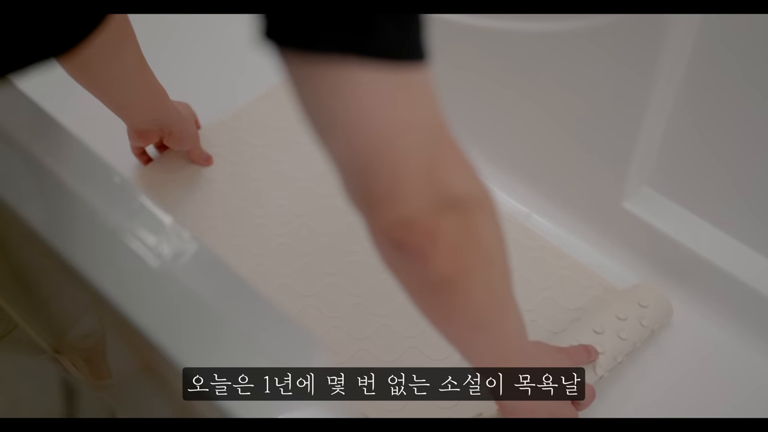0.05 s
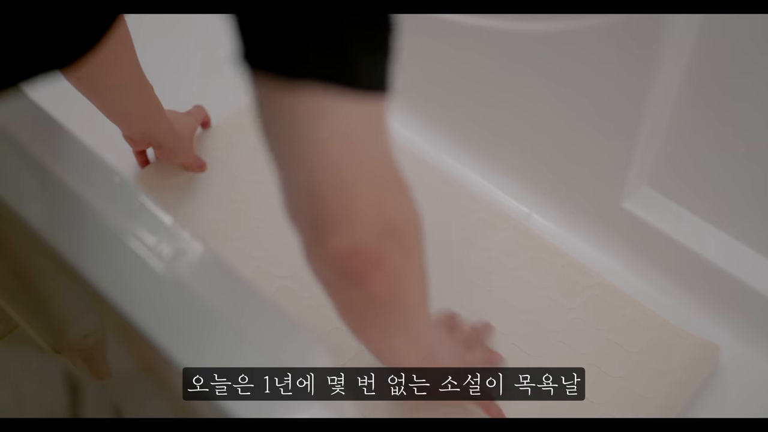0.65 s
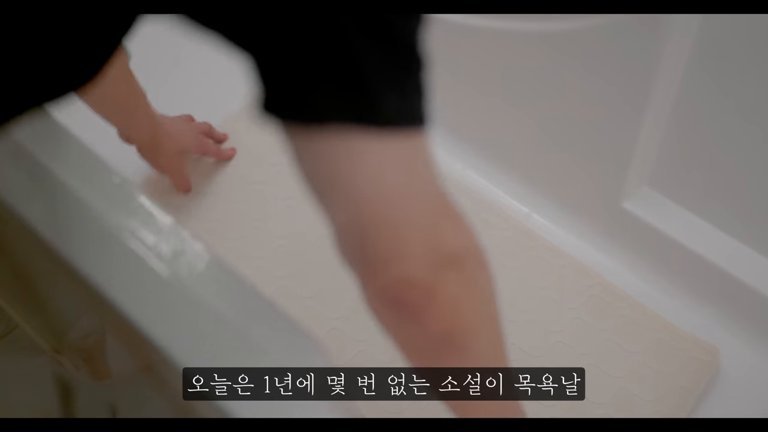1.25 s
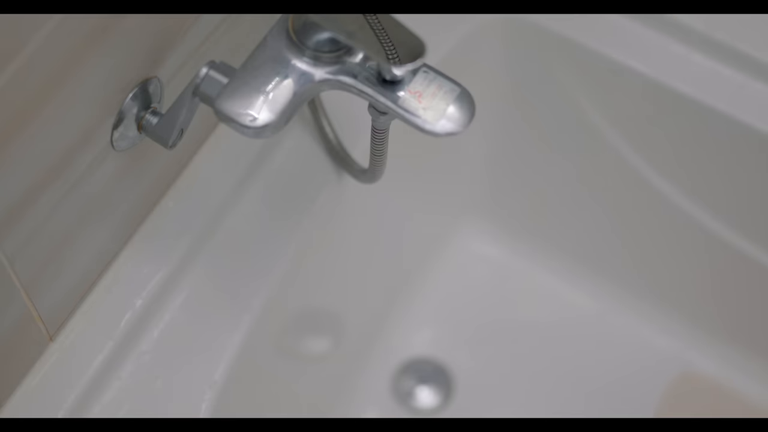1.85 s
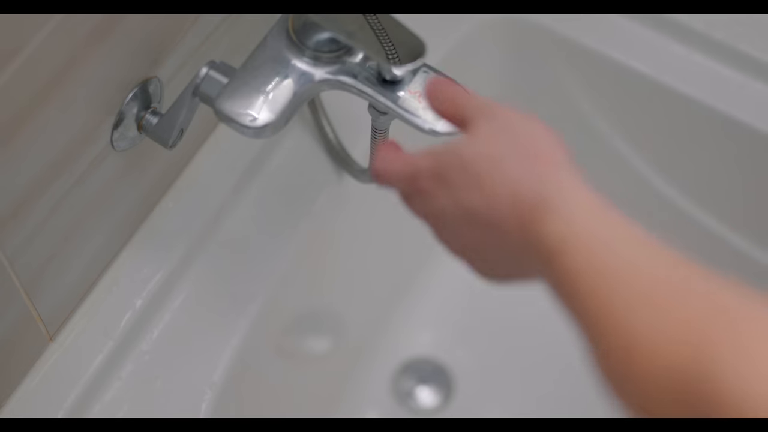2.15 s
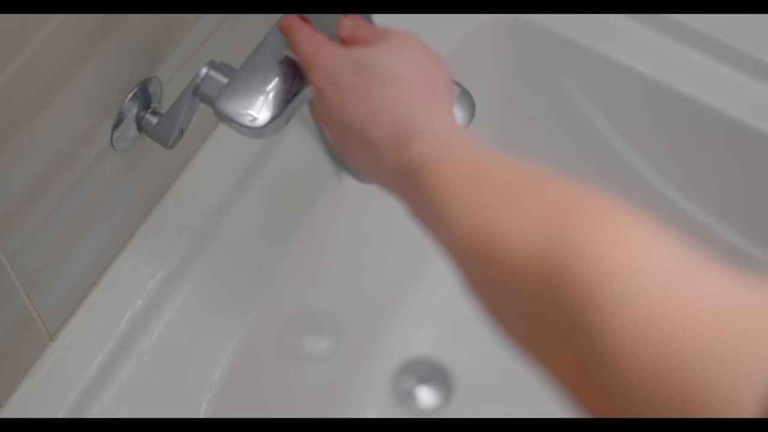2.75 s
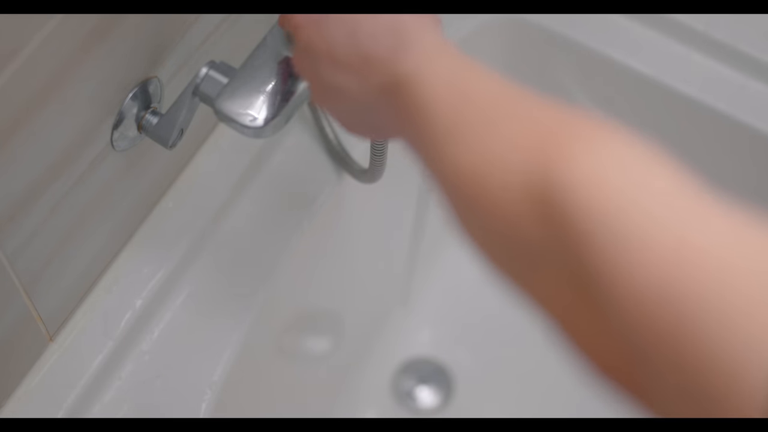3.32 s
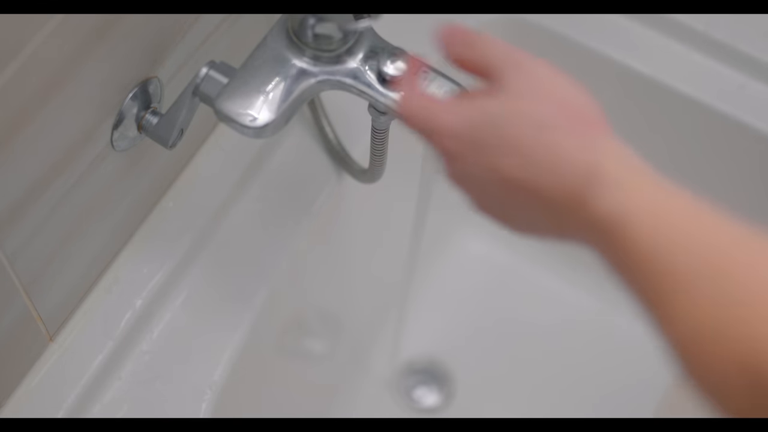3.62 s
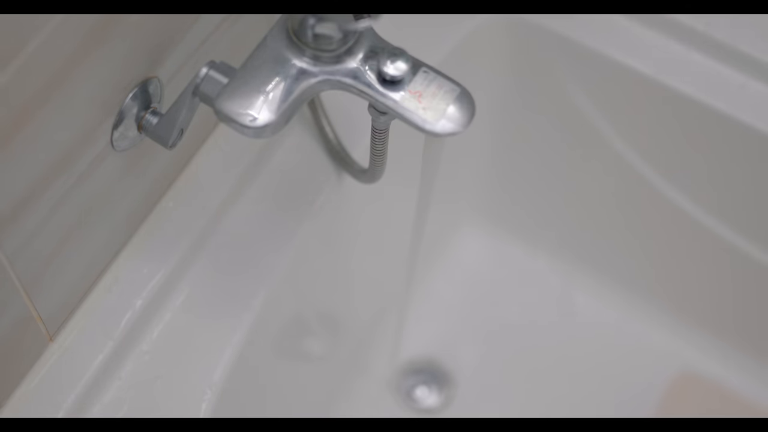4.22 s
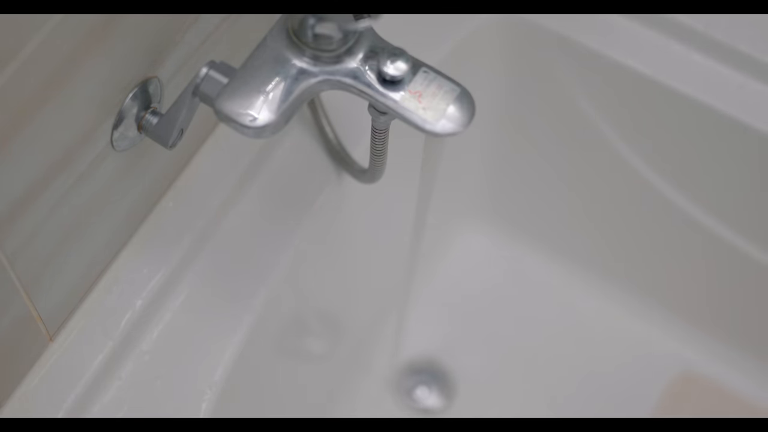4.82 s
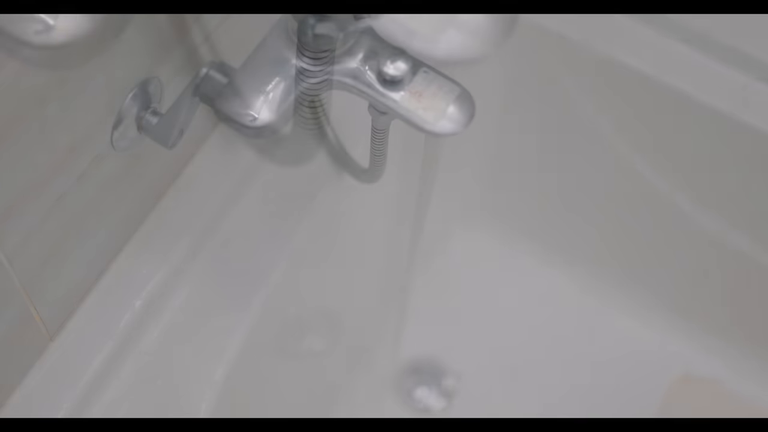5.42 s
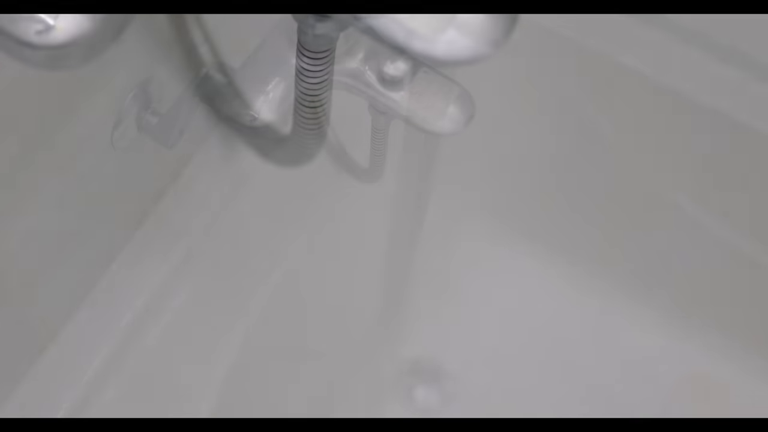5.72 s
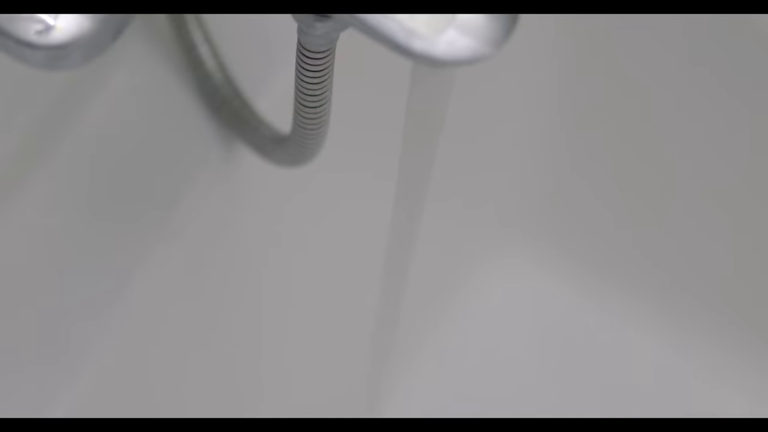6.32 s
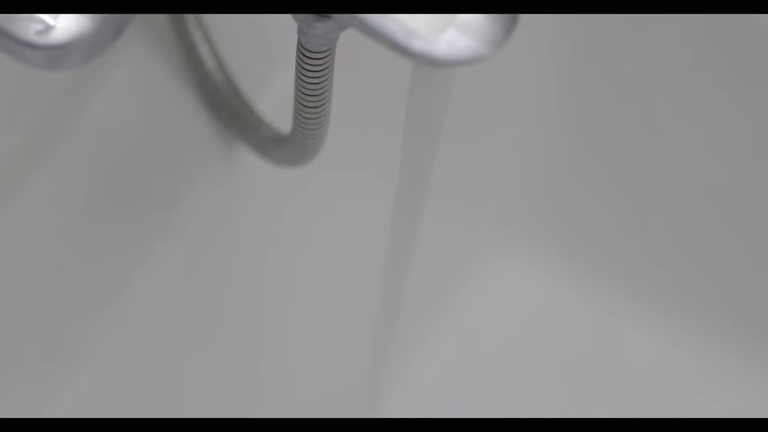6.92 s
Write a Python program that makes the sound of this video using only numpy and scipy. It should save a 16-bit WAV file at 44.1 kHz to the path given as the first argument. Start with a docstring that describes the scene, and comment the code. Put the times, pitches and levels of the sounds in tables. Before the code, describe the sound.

Wet slaps of a rubber mat, a few soft bumps, then a tap opens and water pours onto the bathtub floor.

```python
"""First a wet rubber mat slides and slaps flat in an empty bathtub, popping the air trapped under it.
Then a hand rustles toward the tap, the tub takes a few dull bumps, and the lever rattles.
At about 3 s the valve knocks, air hisses from the spout and the first water dribbles down.
At 3.5 s the valve bangs fully open, and to the end a jet spatters on the tub floor and traps ringing
bubbles. It all echoes in a small tiled bathroom, over a low hush, a thin whine and a faint high hiss."""
import sys
import numpy as np
from scipy import signal
from scipy.fft import rfft, irfft, next_fast_len
from scipy.io import wavfile
from scipy.ndimage import uniform_filter1d

SR = 44100
rng = np.random.default_rng(int(sys.argv[2]) if len(sys.argv) > 2 else 0)


def master(y):
    """Save y as 16-bit WAV."""
    cut = np.clip(np.atleast_2d(y).T, -1, 1)
    pcm = np.round(cut * 32767)  # scale
    wavfile.write(sys.argv[1], SR, pcm.astype(np.int16))


N = 307377
TIME = np.arange(N) / SR
SIZE = 2 ** 15  # samples in one short sound or filter
FREQ = np.maximum(np.fft.rfftfreq(SIZE, 1 / SR), 1)
JET_START_S = 3.467  # the valve is thrown open


def jet():
    """The jet breaks into drops that crack on the tub and trap bubbles; one sound per landing spot."""
    # tone of the spray: pitch_hz, level_db
    spray_tone = [(50, -29), (85, -42), (130, -23.5), (270, -15.5), (420, -16), (800, -13.5), (1450, -12.5),
                  (2200, -7.5), (4800, -3.5), (6600, 0.5), (8300, 4), (10000, 3), (12000, -2.5),
                  (15000, -13.5)]
    # notes of the tub and the thin film of water on it: pitch_hz, width_hz, above_spray_db
    film_notes = [(264, 59, 4.5), (3120, 70, 2.5), (4050, 330, 3.5), (4830, 240, 2), (5044, 230, 4.5),
                  (5820, 110, 1), (6060, 91, 0.5), (8130, 250, -2)]
    film = np.sqrt(1 + modes(film_notes) ** 2)
    spray = undb(along(spray_tone)) * film
    bubble_tone = film / (1 + (1200 / FREQ) ** 3)  # small bubbles give off no bass
    flow = envelope(JET_START_S, rise_s=0.014)
    spatter_db = -19.51 - 0.21 * (TIME - JET_START_S)  # softer as the tub floor gets wet
    gurgle_gain = undb(-35 + 2.6 * wander(rate=22))
    # the wavering jet shares its flow among three spots, now more here, now more there
    shares = np.array([undb(4.0 * wander(rate=14)) for _ in range(3)])
    shares /= np.linalg.norm(shares, axis=0)
    surge, out = undb(0.8 * wander(rate=50)), []
    for share in shares:
        small_drops = clicks(rate=4000, spread_db=2.0)
        big_drops = undb(-2.5) * cracks(rate=100, spread_db=4.2, decay_s=.0012)
        spatter = unit(colour((small_drops + big_drops) * surge, spray))
        fizz = bubbles(rate=220, low_hz=4553, high_hz=10180, cycles=115, glide=0.106, spread_db=3.0)
        gurgle = bubbles(rate=200, low_hz=2120, high_hz=5530, cycles=13.6, glide=0.094, spread_db=2.5)
        bubbling = colour(undb(spatter_db - 13.49) * fizz + gurgle_gain * gurgle, bubble_tone)
        out.append(flow * share * (undb(spatter_db) * spatter + bubbling))
    return out


def cracks(rate, spread_db, decay_s):
    """Big drops land, each bursting into a very short puff of noise."""
    impacts = clicks(rate, spread_db) ** 2 + 1e-18
    energy = signal.lfilter([1], [1, -np.exp(-2 / (decay_s * SR))], impacts)
    return unit(np.sqrt(energy) * rng.choice([-1, 1], N))


def bubbles(rate, low_hz, high_hz, cycles, glide, spread_db, size=N):
    """Small air pockets ring briefly, rising in pitch as they fade."""
    out = np.zeros(size + SR)
    for when, pitch, strength, life in rng.random((int(rate * size / SR), 4)):
        hz = low_hz * (high_hz / low_hz) ** pitch
        length = int(np.clip(cycles * (.5 + life) / hz, 0, .5) * SR) + 2
        age = np.arange(length) / length
        phase = 2 * np.pi * hz * length / SR * age * (1 + glide * age / 2)
        ring = np.sin(phase) * np.exp(-np.log(100) * age)
        start = int(when * size)
        out[start:start + length] += ring * undb(-spread_db * np.log(max(strength, .01)))
    return unit(out[:size])


def spurts():
    """The film of water folds over and traps a cloud of bubbles of similar size."""
    # bubble clouds: middle_s, level_db, pitch_hz
    clouds = [(3.669, -25.5, 3900), (3.80, -28, 3900), (3.835, -32, 2590), (4.33, -31.5, 2300),
              (4.36, -25, 4220), (4.79, -29.5, 2990), (5.068, -33, 2380), (5.37, -31, 3580),
              (5.842, -28.5, 3680), (6.16, -35, 3280), (6.365, -27, 3980), (6.39, -29.5, 2395),
              (6.61, -31, 3630)]
    rise_s, pitch_ratio = 0.032, 1.3
    size, out = int(2 * rise_s * SR), 0
    for middle_s, db, hz in clouds:
        cloud = bubbles(rate=640, low_hz=hz / pitch_ratio, high_hz=hz * pitch_ratio,
                        cycles=40, glide=0.12, spread_db=-1, size=size)
        spurt = colour(cloud * np.hanning(size), resonance(hz, hz) ** 2)
        out += place(spurt, middle_s - rise_s, db)
    return out


def trickle():
    """Air hisses out of the spout just before the first water dribbles down; both give way to the jet."""
    # tone of the escaping air: pitch_hz, level_db
    hiss_tone = [(1000, -44), (4000, -15), (7000, -6), (9800, 3), (12000, -2.5), (15500, -10)]
    # tone of the first drops landing: pitch_hz, level_db
    dribble_tone = [(60, -41), (140, -4.5), (300, -2), (450, -5.5), (900, -4.5), (1500, 0), (2300, -1),
                    (4000, -8.5), (8000, -11), (15000, -17)]
    water_start_s, water_rise_s, easing_db_per_s = 3.17, 0.035, 13
    air = envelope(start_s=3.122, rise_s=0.021, stop_s=JET_START_S, fall_s=0.14)
    water = envelope(water_start_s, water_rise_s, stop_s=JET_START_S, fall_s=0.14)
    easing = undb(-easing_db_per_s * np.maximum(TIME - water_start_s - water_rise_s, 0))
    tap_ring = undb(-7) * resonance(hz=5330, width_hz=90)
    hiss = unit(colour(rng.standard_normal(N), undb(along(hiss_tone)) + tap_ring))
    hiss_db = -39.5 + 5 * water  # louder once water reaches the mesh in the spout
    dribble = unit(colour(clicks(rate=4500, spread_db=2.0), undb(along(dribble_tone))))
    return easing * (air * undb(hiss_db) * hiss + water * undb(-34.5) * dribble)


def tap():
    """The lever rattles when gripped; the valve knocks at its stops and spits a burst of water."""
    # the lever rattling under the fingers: start_s, level_db
    rattles = [(2.388, -44.5), (2.407, -52), (2.433, -55)]
    # notes the lever rings at: pitch_hz, width_hz, level_db
    lever_notes = [(298, 99, -3), (767, 130, 2.5), (948, 48, 3.5), (3000, 560, -14), (3680, 220, -6),
                   (4000, 330, -13), (6770, 370, -6.5), (7600, 200, -12), (9750, 600, -22)]
    # valve knocks: start_s, level_db, burst_above_knock_db
    knocks = [(3.0317, -43, -32), (3.4663, -21.5, 6)]
    # notes the body of the tap rings at: pitch_hz, width_hz, level_db
    body_notes = [(267, 200, -7.5), (620, 160, -6.5), (1460, 240, -1), (1690, 150, 5.5), (1790, 240, -1.5),
                  (3000, 6000, -24), (5330, 60, -9), (7140, 150, -25)]
    # tone of the burst of water: pitch_hz, level_db
    burst_tone = [(100, -20), (500, -7), (1400, 6.5), (2500, 4.5), (4500, 11), (6200, -1), (8200, 12.5),
                  (11000, 3), (15000, -5)]
    lever, body = modes(lever_notes, order=2), modes(body_notes, order=2)
    water_delay_s, out = 0.00082, 0
    for start_s, db in rattles:
        out += place(colour(blow(decay_s=.002, snap=0.67), lever), start_s, db)
    for start_s, db, burst_db in knocks:
        knock = colour(blow(decay_s=0.0039, snap=1.6), body)
        burst = colour(blow(decay_s=.001), undb(along(burst_tone)))
        out += place(knock, start_s, db) + place(burst, start_s + water_delay_s, db + burst_db)
    return out


def mat():
    """The mat slides and flops down with wet smacks, popping the air under it and thumping the tub."""
    # slaps: start_s, level_db, treble_limit_hz, pop_hz, pop_db, thump_above_slap_db, decay_s,
    # smack_above_slap_db
    slaps = [(0.298, -45, 2200, 870, 14, -8, 0.035, -15), (0.338, -35, 1800, 490, 7, -9.5, 0.033, -18.5),
             (0.437, -36, 1850, 557, 10, -7.5, 0.018, -18),
             (0.563, -25, 5200, 4500, 12.5, -21.5, 0.0053, -21),
             (0.642, -22.5, 5000, 1400, -3, -32, 0.013, -12.5),
             (1.034, -38, 3200, 1000, -3, -15, 0.0041, -12), (1.065, -22.5, 3950, 860, 7, -20, 0.0024, -30),
             (1.1359, -29, 2100, 1110, 5, -23, 0.0025, -16),
             (1.142, -29.5, 5000, 620, 16, -4.5, 0.0036, -11)]
    # tone of the tub under the mat: pitch_hz, level_db
    tub_tone = [(60, -45), (120, -14), (330, -15.5), (520, -6.5), (780, -3), (1250, -2.5), (2000, -5.5),
                (3300, -7.5), (5000, -13.5), (9000, -15.5), (15000, -27.5)]
    # tone of wet rubber meeting enamel: pitch_hz, level_db
    smack_tone = [(1500, -27), (3500, 6), (5000, 2), (9000, 0), (12000, -8), (15000, -19)]
    # the mat dragged over the tub: start_s, length_s, level_db, scuff_above_rub_db
    drags = [(-0.02, 0.044, -57, -5), (0.275, 0.27, -58.5, -3), (0.662, 0.25, -36, -6),
             (1.2, 0.13, -53.5, -4.5), (1.34, 0.06, -44.5, -9.5), (1.534, 0.053, -53.5, -15),
             (1.602, 0.02, -69.5, 12)]
    tub, out = undb(along(tub_tone)), 0
    for start_s, db, limit_hz, pop_hz, pop_db, thump_db, decay_s, smack_db in slaps:
        softness = 1 / np.sqrt(1 + (FREQ / limit_hz) ** 8) + undb(-12)
        pop = 1 + undb(pop_db) * resonance(pop_hz, 450 + 0.31 * pop_hz) ** 2
        # a brief slap is mostly snap, a long one mostly flutter
        slap = colour(blow(decay_s, snap=0.0024 / decay_s), tub * softness * pop)
        smack = colour(blow(decay_s=.004), undb(along(smack_tone)))
        thump = colour(blow(decay_s=0.034), resonance(hz=247, width_hz=520) ** 4)
        out += place(slap, start_s, db)
        out += place(smack, start_s, db + smack_db)
        out += place(thump, start_s, db + thump_db)
    dull, bright = 1 / (1 + (FREQ / 3000) ** 2), FREQ ** 2 / (FREQ ** 2 + 4000 ** 2)
    rub = unit(colour(clicks(rate=4300, spread_db=4), tub * dull))
    scuff = unit(colour(clicks(rate=2500, spread_db=3.5), tub * bright))
    for start_s, length_s, db, scuff_db in drags:
        stroke = envelope(start_s, rise_s=0.024, stop_s=start_s + length_s, fall_s=0.032)
        out += undb(db) * stroke * (rub + undb(scuff_db) * scuff)
    return out


def bumps():
    """Soft bumps wake only the low ring of the tub."""
    # dull thuds around the tub: start_s, level_db, pitch_hz, decay_s
    thuds = [(0.0, -47.5, 116, 0.021), (0.355, -49, 160, .008), (2.04, -48.5, 315, 0.081),
             (2.11, -63, 160, 0.017), (2.394, -54, 121, 0.04), (2.55, -47, 197, 0.016),
             (2.767, -59, 830, 0.018), (3.043, -48.5, 280, 0.082), (3.467, -34, 202, 0.0051)]
    return sum(place(colour(blow(decay_s), resonance(hz, hz) ** 4), start_s, db)
               for start_s, db, hz, decay_s in thuds)


def bathroom(x, direct_db):
    """Sound arrives directly, then as quick echoes off the tub walls, then as a ring off the tiles."""
    # time the echoes take to fade by 60 dB: pitch_hz, fade_s
    fade_times = [(100, 0.43), (300, 0.42), (800, 0.66), (1600, 0.62), (2400, 0.45), (5000, 0.49),
                  (14000, 0.44)]
    t = TIME[:SIZE]
    noise, echoes = rfft(rng.standard_normal(SIZE)), 0
    octaves = np.clip(np.log2(FREQ / 32), 0, 9)
    for octave in range(10):
        band = np.maximum(1 - np.abs(octaves - octave), 0)
        fade_s = along(fade_times, 32 * 2 ** octave)
        echoes += irfft(noise * band) * np.exp(-np.log(1000) * t / fade_s)
    echoes *= (1 + 0.61 * np.exp(-t / 0.005)) * (t > .001)  # strong first echoes, after a tiny gap
    echoes /= np.linalg.norm(echoes)
    echoes[0] += undb(direct_db)
    return signal.oaconvolve(x, even(echoes))[:N]


def background():
    """A low hush, a thin whine and a faint high hiss; a rustle swells as the hand reaches for the tap."""
    # tone of the quiet room: pitch_hz, level_db
    hush_tone = [(30, -61), (70, -37), (120, -1), (200, -7), (290, 2), (420, -9), (850, -8.5), (1400, -15),
                 (3000, -21), (8000, -22.5), (12000, -21.5), (15000, -37)]
    # a thin whine near 10 kHz and a faint, narrow band of very high hiss near 13.4 kHz: pitch_hz,
    # half_width_hz, level_before_change_db, level_after_change_db
    high_bands = [(10020, 25, -80, -81), (13400, 350, -73.5, -82)]
    change_s = 1.66  # the thin high bands change level here
    hush = undb(along(hush_tone))
    brighter = 1 + undb(-1) * resonance(hz=2300, width_hz=3200)
    rustle = unit(colour(rng.standard_normal(N), hush * brighter))
    reach = envelope(start_s=1.27, rise_s=1.0, stop_s=2.335, fall_s=0.14)
    out = undb(-61.5) * unit(colour(rng.standard_normal(N), hush))
    out += undb(-54) * reach * rustle
    for hz, half_width_hz, early_db, late_db in high_bands:
        band = unit(colour(rng.standard_normal(N), resonance(hz, 2 * half_width_hz) ** 2))
        out += undb(np.where(TIME < change_s, early_db, late_db)) * band
    return out


def blow(decay_s, snap=0):
    """One thing strikes another: an optional sharp snap, then a noisy force that dies away."""
    force = rng.choice([-1, 1], SIZE) * np.exp(-np.minimum(TIME[:SIZE] / decay_s, 20))
    force[0] += snap * np.linalg.norm(force)
    return even(force)


def clicks(rate, spread_db):
    """Tiny random impacts, about `rate` a second, most weak and a few strong."""
    strength = undb(spread_db * np.minimum(rng.exponential(size=N), 3.5))
    return unit((rng.random(N) < rate / SR) * strength * rng.choice([-1, 1], N))


def wander(rate):
    """A smooth random drift that takes a new direction `rate` times a second."""
    step = int(SR / rate)
    stairs = np.repeat(rng.standard_normal(N // step + 1), step)
    return unit(uniform_filter1d(stairs, step)[:N])


def envelope(start_s, rise_s, stop_s=np.inf, fall_s=1):
    """Rise smoothly, hold until the stop, then die away."""
    rise = np.sin(np.pi / 2 * np.clip((TIME - start_s) / rise_s, 0, 1)) ** 2
    return rise * np.exp(-np.clip((TIME - stop_s) / fall_s, 0, 20))


def place(x, start_s, db):
    """Put a short sound at its time, with the energy of 30 ms at this level."""
    placed = np.concatenate([np.zeros(max(int(start_s * SR), 0)), x, np.zeros(N)])[:N]
    return placed * undb(db) * np.sqrt(.03 * SR / np.sum(x ** 2))


def resonance(hz, width_hz):
    """Gain of one ringing note: 1 at its pitch, less on either side."""
    return 1 / np.sqrt(1 + ((FREQ ** 2 - hz ** 2) / (FREQ * width_hz)) ** 2)


def modes(notes, order=1):
    """Gain of several ringing notes together; order 2 makes each peak steeper."""
    return np.sqrt(sum((undb(db) * resonance(hz, width) ** order) ** 2 for hz, width, db in notes))


def colour(x, gain):
    """Turn each frequency up or down by its gain; any ringing comes after the sound, never before."""
    cepstrum = irfft(np.log(gain + 1e-9), SIZE)
    cepstrum[1:SIZE // 2] *= 2
    cepstrum[SIZE // 2 + 1:] = 0
    response = irfft(np.exp(rfft(cepstrum)))[:4096]
    return signal.oaconvolve(x, response)[:len(x)]


def even(x):
    """Even out the overall tone of a short sound but keep its fine peaks and dips."""
    smooth_power = uniform_filter1d(np.abs(rfft(x)) ** 2, size=120)
    return colour(x, 1 / np.sqrt(smooth_power))


def along(points, freq=FREQ):
    """Join (pitch_hz, value) points with lines, giving every octave equal room."""
    hz, value = np.transpose(points)
    return np.interp(np.log(freq), np.log(hz), value)


def undb(db):
    """Turn decibels into a gain to multiply by."""
    return 10 ** (np.asarray(db) / 20)


def unit(x):
    """Scale to an average (rms) level of 1."""
    return x / np.sqrt(np.mean(x ** 2))


def scene():
    """The tub, tap and jet each get their own echoes, which differ a little between left and right."""
    # stereo width: pitch_hz, side_above_mid_db
    width = [(60, -11), (160, -51), (380, -30), (700, -16.5), (1290, -9.5), (2380, -9), (3400, -12),
             (4600, -60), (8500, -115), (11000, -11.5), (14000, -2.5)]
    tub = mat() + bumps() + trickle() + spurts()
    faucet, jet_spots = tap(), jet()
    mid = bathroom(tub, direct_db=-6.0) + bathroom(faucet, direct_db=-5.5)
    mid += sum(bathroom(spot, direct_db=-3) for spot in jet_spots) + background()
    side = bathroom(tub + faucet + sum(jet_spots), direct_db=-20) + background()
    side = colour(side, undb(along(width)))
    # echoes reach left and right out of step but equally loud
    side = signal.hilbert(side, next_fast_len(N))[:N].imag
    return np.array([mid + side, mid - side])


def record(dry):
    """The microphone thins the deep bass, flattens peaks past full scale and cuts the highest treble."""
    bass_cut = signal.butter(4, 84, "high", fs=SR, output="sos")
    treble_cut = signal.ellip(10, .2, 80, 15500, fs=SR, output="sos")
    thin = signal.sosfilt(bass_cut, dry)
    return signal.sosfilt(treble_cut, np.clip(thin, -1, 1))


dry = scene()
out = record(dry)
master(out)
```